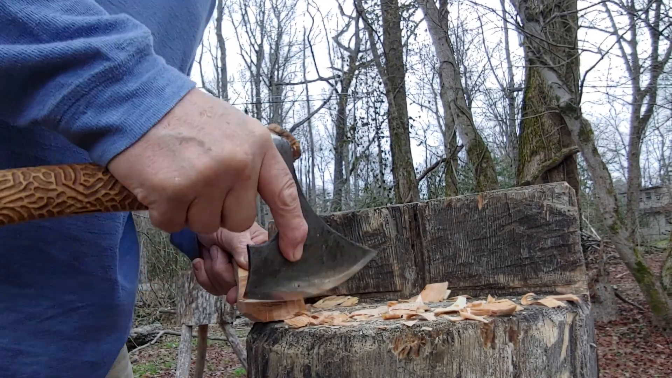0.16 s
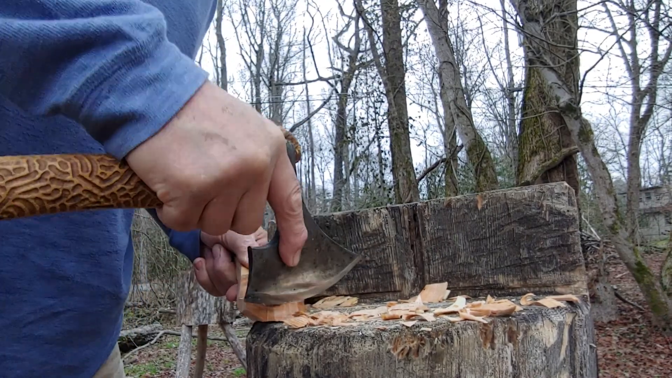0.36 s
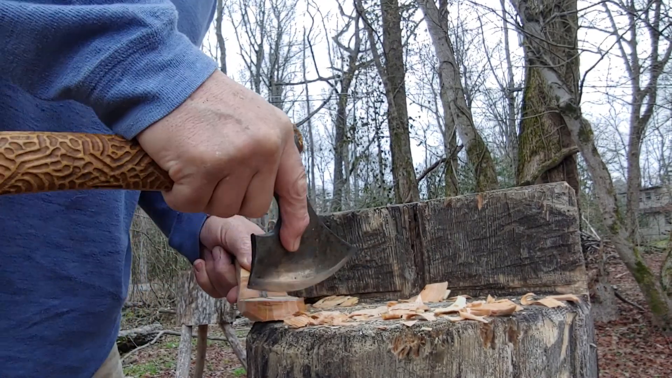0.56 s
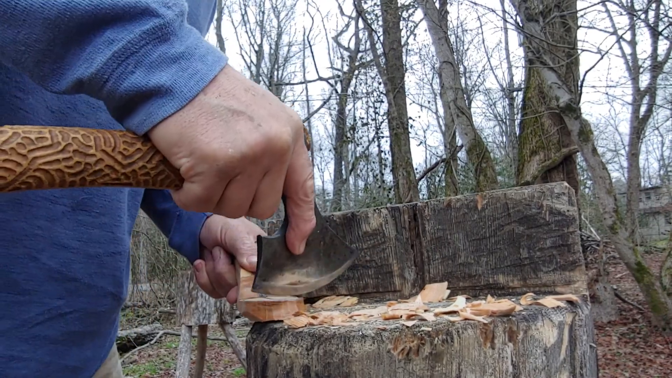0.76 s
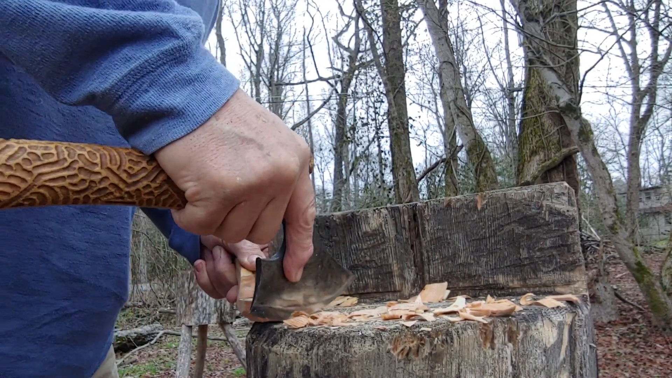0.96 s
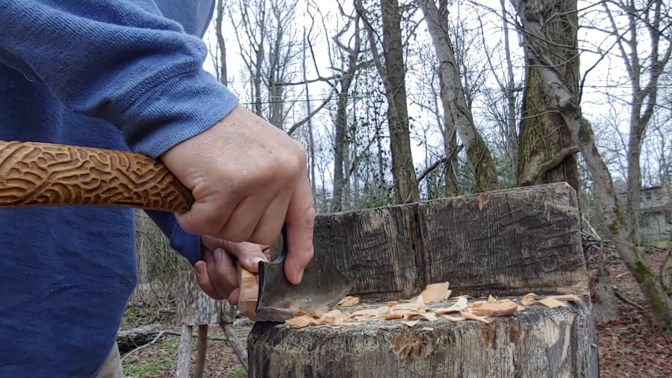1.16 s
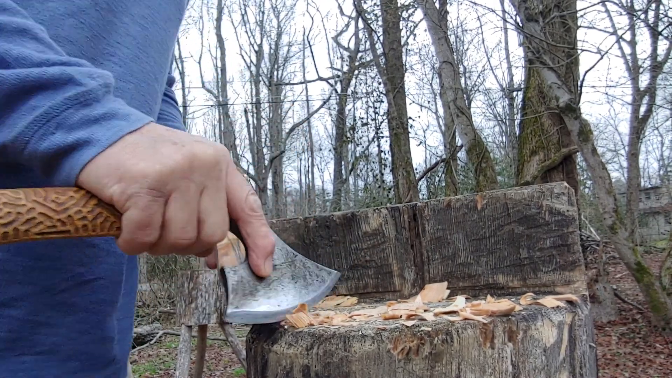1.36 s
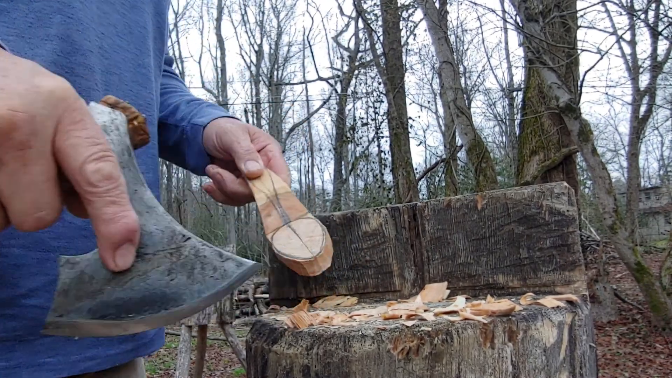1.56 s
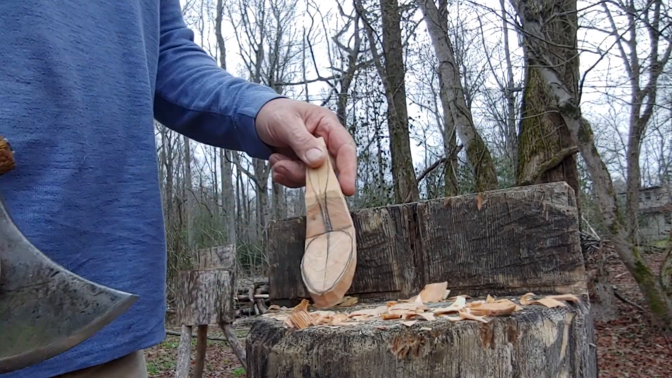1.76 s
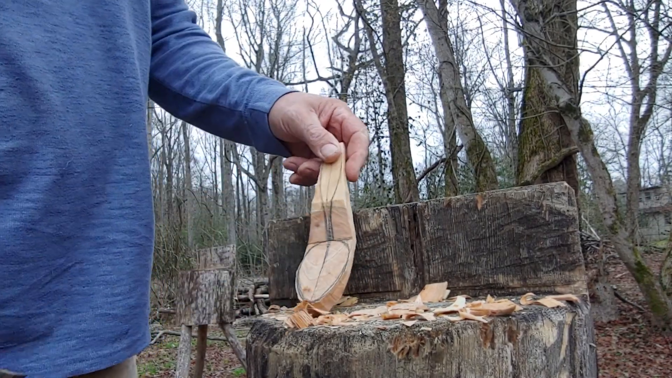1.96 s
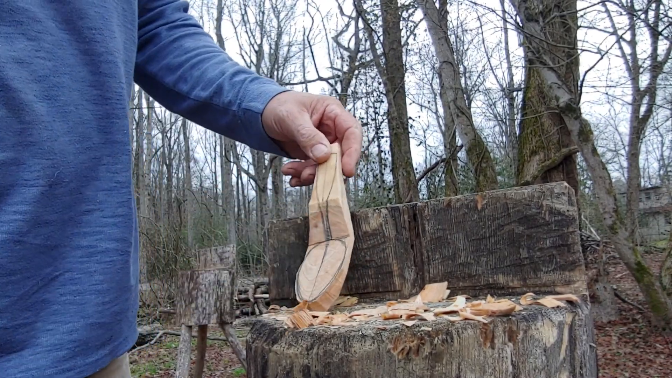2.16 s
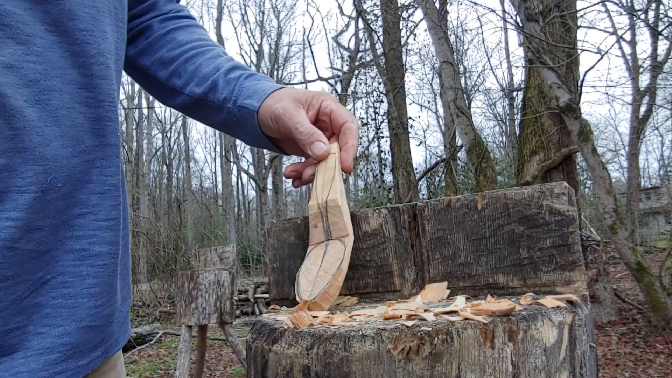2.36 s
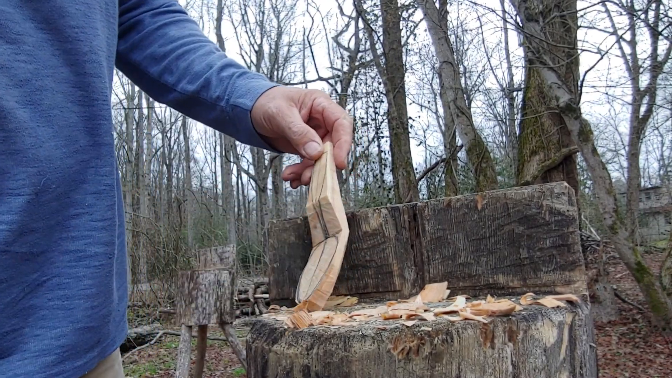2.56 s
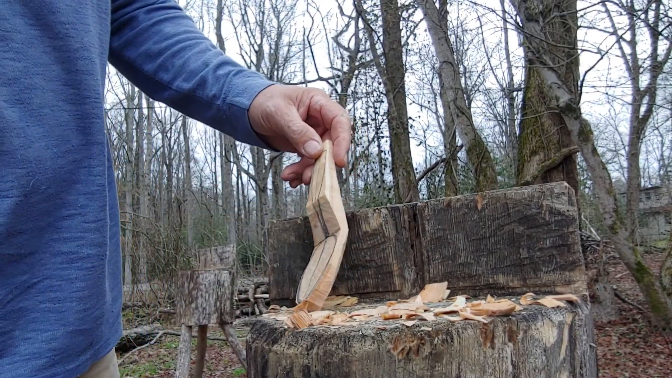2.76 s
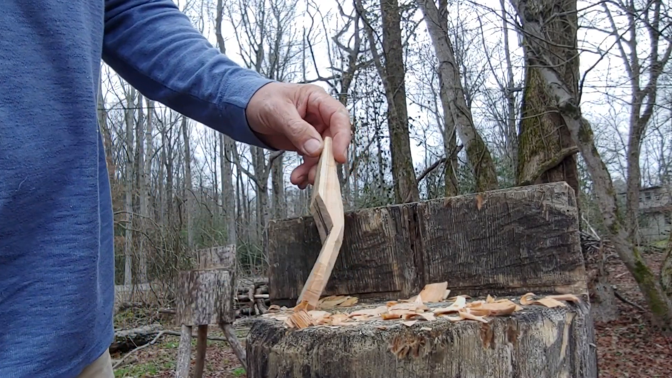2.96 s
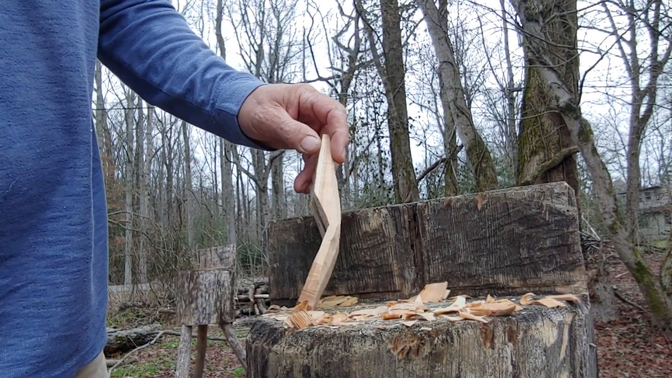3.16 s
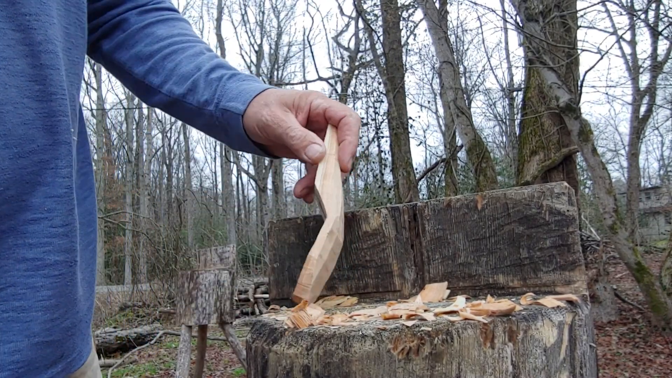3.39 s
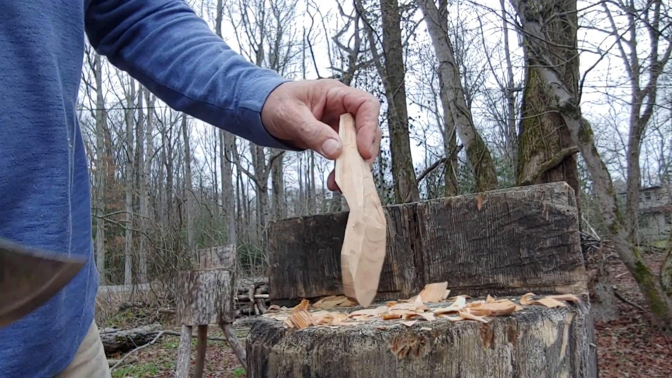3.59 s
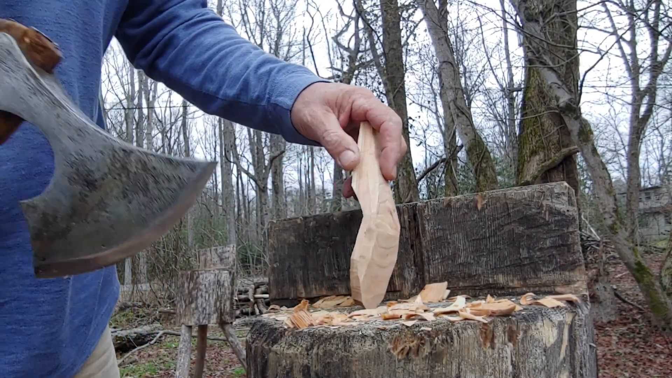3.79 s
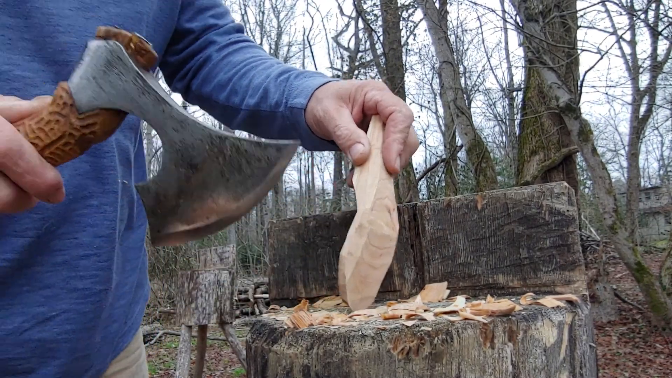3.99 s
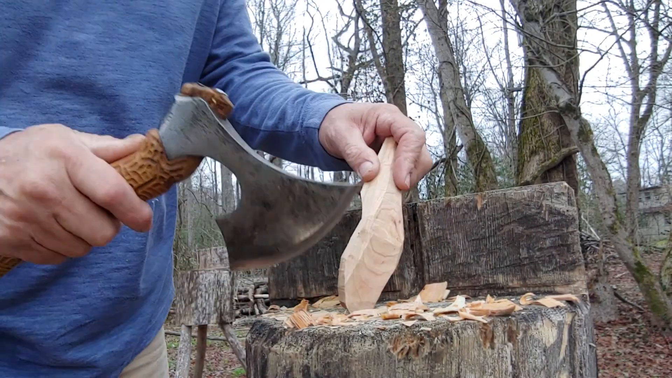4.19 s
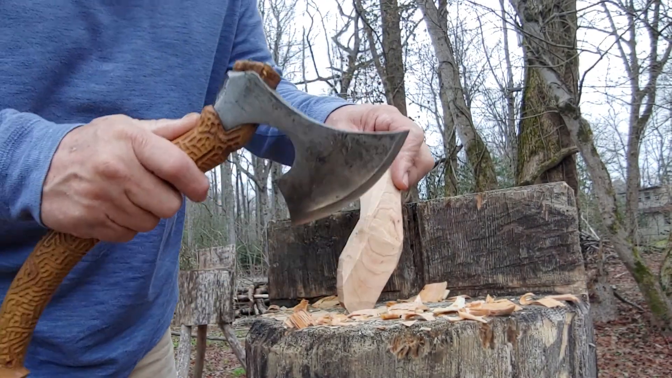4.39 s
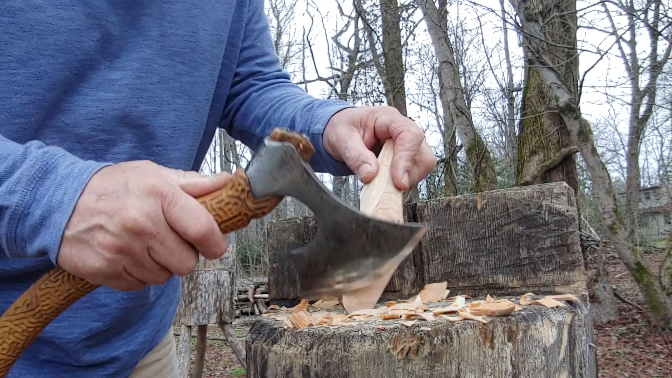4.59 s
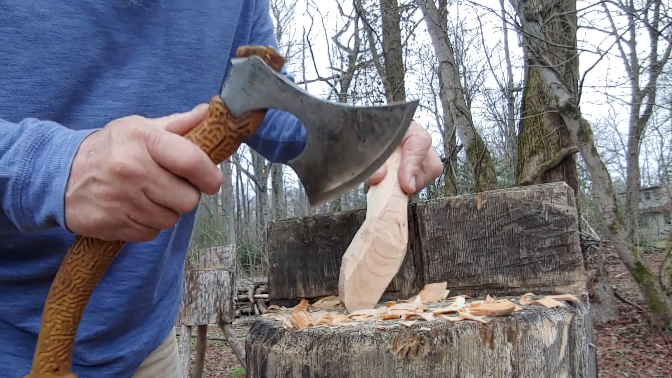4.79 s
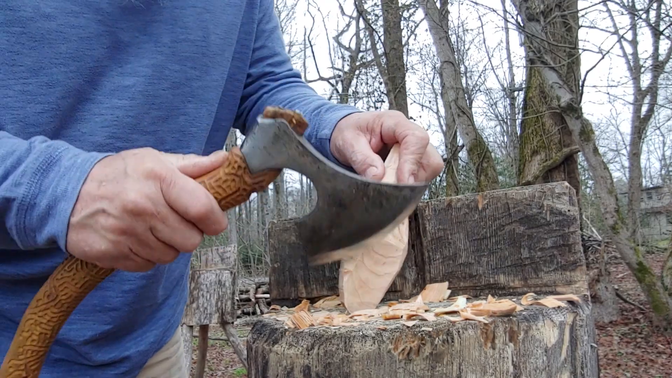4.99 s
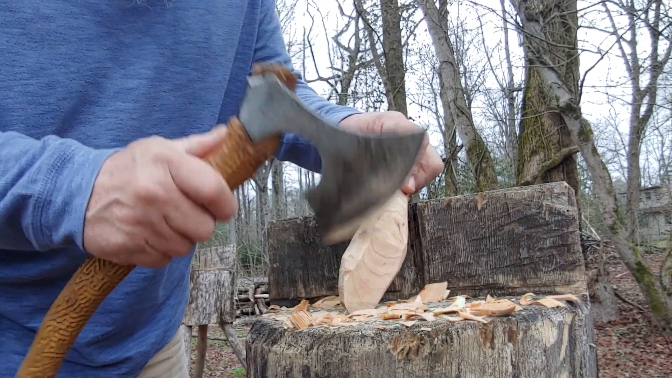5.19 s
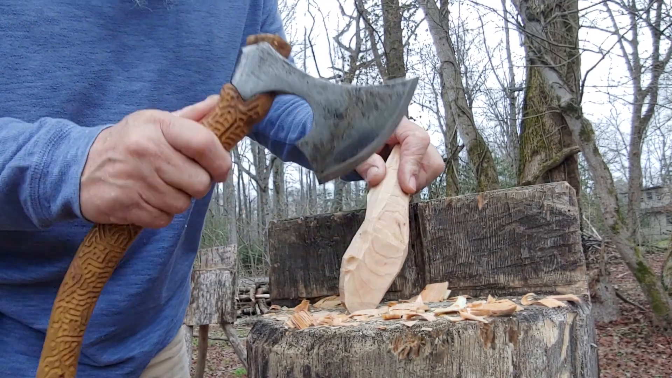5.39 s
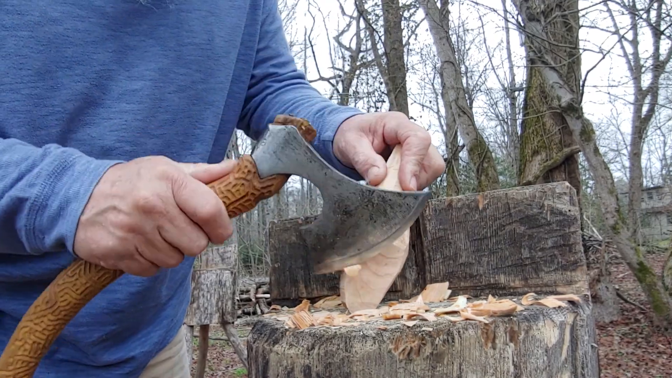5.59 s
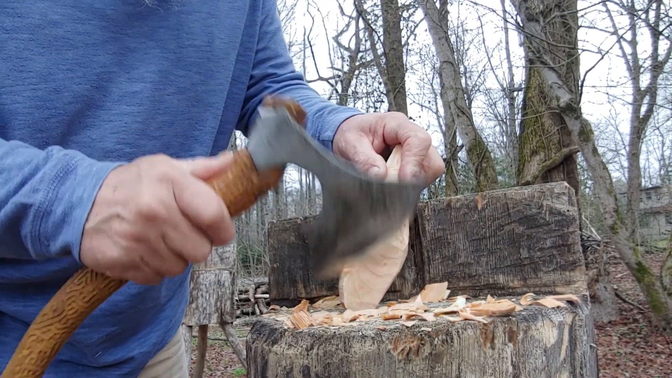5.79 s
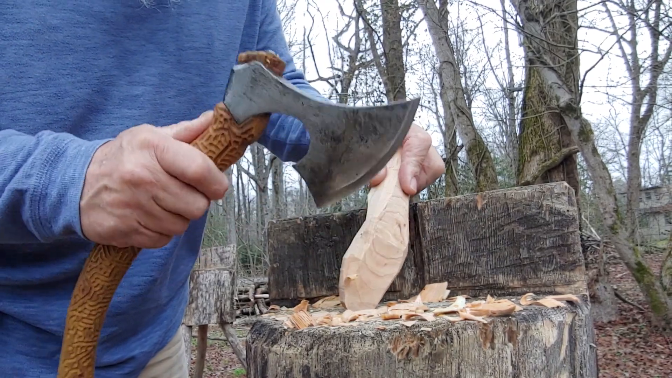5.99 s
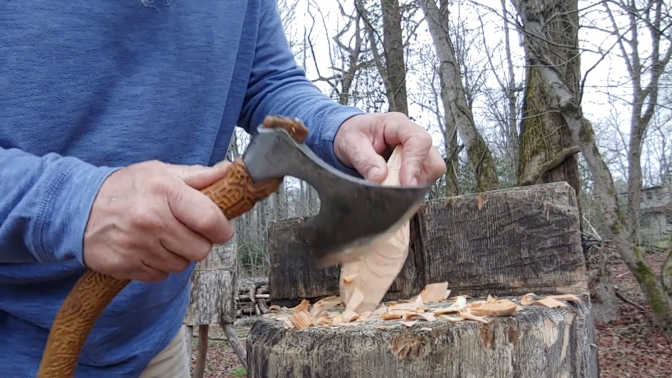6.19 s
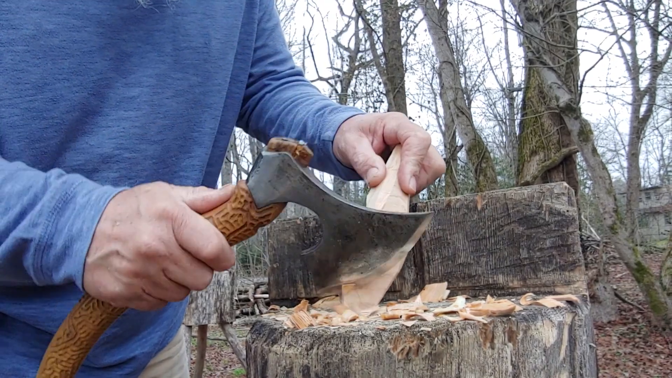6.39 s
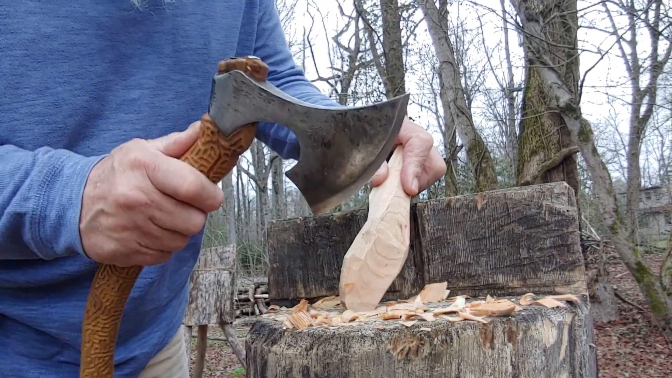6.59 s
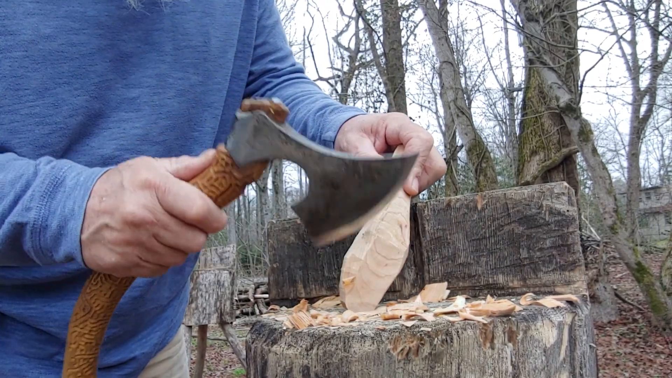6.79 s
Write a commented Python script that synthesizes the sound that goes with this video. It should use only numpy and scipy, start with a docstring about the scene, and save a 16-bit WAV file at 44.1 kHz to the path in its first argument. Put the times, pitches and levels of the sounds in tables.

```python
"""A hand axe shapes a wooden spoon blank on a stump in a wood, close to a pair of microphones.
Three careful cuts, a pause with sleeve rustle and a change of grip, then a run of quick chops.
Each chop is a knock, a burst of tearing fibres, a faint steel ring and a thud that rocks the stump.
A chip lands just after. Light taps and scrapes are scattered tiny clicks with a woody colour.
Trees echo, birds call far off as gliding tones, and a light breeze rumbles as filtered noise."""
import sys
import numpy as np
from scipy import signal
from scipy.fft import rfft, irfft, next_fast_len
from scipy.io import wavfile
from scipy.ndimage import uniform_filter1d

SR = 44100
rng = np.random.default_rng(int(sys.argv[2]) if len(sys.argv) > 2 else 0)


def dump_mix(stems):
    """Bounce the given channels to the path in sys.argv[1] as a 16-bit WAV at rate SR."""
    frames = np.atleast_2d(stems).T  # one column per channel
    limited = np.clip(frames, -1, 1)  # hard clip at full scale
    pcm = np.round(limited * 32767).astype(np.int16)
    wavfile.write(sys.argv[1], SR, pcm)


N = 302085
TIME = np.arange(N) / SR
HZ = np.fft.rfftfreq(4096, 1 / SR)  # frequencies on which short filters are drawn


def amp(db):
    """Turns decibels into gain."""
    return 10 ** (np.asarray(db) / 20)


def unit(x):
    """Scales a signal to rms 1."""
    return x / np.sqrt(np.mean(x ** 2) + 1e-20)


def sized(x, db, seconds):
    """Scales a burst to the energy of a level held for so many seconds."""
    return x * amp(db) * np.sqrt(seconds * SR / (np.sum(x ** 2) + 1e-20))


def add(mix, s, sound):
    """Adds a stereo sound to the mix at time s, cutting off whatever falls outside."""
    start = round(s * SR)
    sound = sound[:, max(-start, 0):]
    part = mix[:, max(start, 0):][:, :sound.shape[1]]
    part += sound[:, :part.shape[1]]


def read(points, hz):
    """Reads a table of values between its points, along a log-frequency axis."""
    f, value = np.transpose(points)
    return np.interp(np.log(hz + 1), np.log(f + 1), value)


def response(db):
    """Makes a short sound that starts at once (minimum phase) from a dB spectrum on the HZ grid."""
    both_halves = np.r_[db, db[-2:0:-1]]
    log_gain = np.log(amp(both_halves))
    return np.fft.ifft(np.exp(signal.hilbert(log_gain).conj())).real


def coloured(x, points):
    """Gives a scene-long signal a spectrum, at rms 1."""
    gain = amp(read(points, np.fft.rfftfreq(N, 1 / SR)))
    return unit(irfft(rfft(x) * gain, N))


def bump(hz, width, db):
    """A resonance, drawn as a rise in the dB spectrum."""
    return db / (1 + (2 * (HZ - hz) / width) ** 2)


def swell(s, rise_s, fall_s):
    """A smooth rise to 1 at time s and a smooth fall."""
    return np.exp(-((TIME - s) / np.where(TIME < s, rise_s, fall_s)) ** 2)


# how the two microphone ports differ in level: (frequency [Hz], left minus right [dB])
PORT_LEVELS = [(200, -.5), (460, -2.5), (850, 4.5), (1150, 4.5), (1600, -4), (2150, 8), (2600, -0.5),
               (3000, -4), (3700, 6), (4900, -9), (6300, 13.5), (8000, -12.5), (11300, 10)]
# how far the nearer port is ahead: (frequency [Hz], phase lead [radians])
PORT_LEAD = [(200, 0.5), (500, 1.16), (750, 0.3), (950, 1.88), (1400, 0.7), (1900, 1.98), (2500, 1.65),
             (3100, 2.5), (4500, 2.5), (5300, -0.9), (6300, 6), (11000, 6)]


def placed(x, side):
    """Places a sound: side 1 is left, -1 right; the nearer port leads and the two differ in tone."""
    size = next_fast_len(len(x) + len(HZ))
    hz = np.fft.rfftfreq(size, 1 / SR)
    level = amp(side * read(PORT_LEVELS, hz) / 2)
    half = level * np.exp(.5j * side * read(PORT_LEAD, hz))
    late = np.r_[np.zeros(8), x]  # room for the leading port
    return irfft(rfft(late, size) * np.array([half, 1 / half]), size)[:, :len(x)]


# broad colour of the struck wood: (frequency [Hz], level [dB])
WOOD_COLOUR = [(40, -25), (200, -19), (350, -8), (480, -11.5), (750, -1.5), (1500, -4), (2100, -4.5),
               (3100, -5.5), (3700, -10.5), (5000, -13.5), (7000, -10), (11000, -30.5), (16000, -42)]
# resonances of the blank: (frequency [Hz], width [Hz], rise over the broad colour [dB])
BLANK_MODES = [(343, 450, 5), (777, 51, 3.5), (1450, 130, 4), (2688, 150, 4), (3200, 230, 5),
               (4240, 290, 9), (4620, 28, 0.5), (6030, 110, 1)]


def wood(treble_db):
    """Spectrum of the blank in dB; a sharper excitation lifts the treble."""
    modes = sum(bump(*mode) for mode in BLANK_MODES)
    return read(WOOD_COLOUR, HZ) + modes + treble_db * HZ ** 2 / (HZ ** 2 + 2800 ** 2)


def fibres(count, per_s, spread_db):
    """Snaps of uneven size at random moments, over count samples, at rms 1."""
    size = amp(spread_db * np.minimum(rng.exponential(1, count), 3))
    snaps_now = rng.random(count) < per_s / SR
    return unit(size * rng.choice([-1, 1], count) * snaps_now)


# every axe blow: (time [s], knock level [dB], tearing level [dB], time until the chip breaks [s],
# tearing t60 [s], treble lift [dB], chip pitch [Hz], stump thud level [dB])
CHOPS = [(0.364, -30.5, -34, .0018, .024, -10, 660, -36),
         (0.8306, -31.5, -45, 0.0022, 0.049, -65, 825, -54),
         (0.9881, -31.5, -31, 0.0014, 0.013, 16.5, 1100, -36),
         (4.5889, -35, -43.5, 0.0033, 0.035, 1, 1090, -49.5),
         (4.9157, -22.5, -22.5, 0.0049, 0.022, -6.5, 1270, -31.5),
         (5.217, -16, -22, .0045, 0.018, -3.5, 1385, -28),
         (5.519, -19, -19.5, .0062, 0.035, -8.5, 1052, -33),
         (5.8036, -20.5, -20.5, .0065, 0.041, -3.5, 1130, -52),
         (6.0978, -18, -19, 0.0042, 0.034, -3, 1525, -34),
         (6.387, -19.5, -18, .0049, .025, -6.5, 2086, -39),
         (6.6708, -21, -18.5, 0.0045, 0.023, -8.5, 1644, -32.5)]
# where the blank stands (1 left, -1 right): laid down at first, upright after the change of grip
LAID_SIDE, UPRIGHT_SIDE = -0.37, 0.85
REGRIP_S = 4.4
# the landing chip: typical delay [s], level against the tearing [dB], treble lift [dB], pitch [Hz]
FALL_S, FALL_DB, FALL_TREBLE_DB, FALL_HZ = 0.055, -40.5, 11, 600


def chops():
    """Every blow of the axe, and the chip that lands after a slightly uneven flight."""
    out = np.zeros((2, N))
    flights = rng.uniform(.88, 1.12, len(CHOPS))
    for (s, knock_db, tear_db, *cut), flight in zip(CHOPS, flights):
        side = LAID_SIDE if s < REGRIP_S else UPRIGHT_SIDE
        add(out, s, chop(knock_db, tear_db, *cut, side))
        add(out, s + FALL_S * flight, tap(tear_db + FALL_DB, FALL_TREBLE_DB, FALL_HZ))
    return out


def chop(knock_db, tear_db, break_s, t60, treble_db, chip_hz, thud_db, side):
    """The edge knocks on the blank, fibres tear until the chip breaks, and the stump takes the blow."""
    t = np.arange(SR // 4) / SR
    break_s = max(break_s, .0005)
    sound = tearing(t, tear_db, break_s, t60, treble_db, chip_hz) + axe_ring(t, tear_db)
    knock = edge_knock(knock_db, chip_hz)
    sound[:len(knock)] -= knock
    thud = stump_thud(thud_db)
    sound[round(break_s * SR):][:len(thud)] += thud
    return placed(sound + stump_rocking(t, thud_db), side)


def tearing(t, db, break_s, t60, treble_db, chip_hz):
    """Fibres snap ever harder until the chip breaks, then die away; wood and chip colour them."""
    force = np.where(t < break_s, t / break_s, amp(-60 * (t - break_s) / t60))
    snaps = force * fibres(len(t), per_s=11000, spread_db=6.5)
    snaps[round(break_s * SR)] -= 8  # the chip lets go
    colour = response(wood(treble_db) + bump(chip_hz, 420, 4.8) + split_colour())
    return sized(signal.fftconvolve(snaps, colour)[:len(t)], db, 0.015)


def split_colour(count=5, width_hz=110, rise_db=5):
    """Each cut leaves a splinter of its own shape, with a few resonances at chance pitches."""
    pitches = np.exp(rng.uniform(np.log(1000), np.log(3400), count))
    return sum(bump(hz, width_hz, rise_db) for hz in pitches)


# faint ring of the axe head: (frequency [Hz], level among the partials [dB], t60 [s])
STEEL_MODES = [(1310, -15, .12), (2360, -8.5, 0.16), (3220, -4, 0.52), (3350, 2, 0.11), (5800, 1.5, 0.075),
               (6700, -1, 0.1)]
STEEL_DB = -35  # against the tearing level


def axe_ring(t, tear_db):
    """The steel head rings as dying sine tones, faded at both ends."""
    ring = 0
    for hz, db, decay in STEEL_MODES:
        phase = rng.uniform(0, 2 * np.pi)
        ring = ring + amp(db - 60 * t / decay) * np.sin(2 * np.pi * hz * t + phase)
    return sized(ring * signal.windows.tukey(len(t), .03), tear_db + STEEL_DB, 0.0058)


# broad colour of the edge striking the blank: (frequency [Hz], level [dB])
KNOCK_COLOUR = [(40, -42.5), (200, -15), (480, -5), (800, 5.5), (1300, -5.5), (2500, -27), (5000, -41),
                (16000, -60)]
# chip pitch at which the knock has this plain colour; exponent by which it follows a higher chip
KNOCK_HZ, KNOCK_FOLLOWS = 1150, 0.49


def edge_knock(db, chip_hz):
    """One short blow through the resonances of the blank; it sounds higher with a higher chip."""
    colour = read(KNOCK_COLOUR, HZ * (KNOCK_HZ / chip_hz) ** KNOCK_FOLLOWS)
    modes = sum(bump(*mode) for mode in BLANK_MODES)
    return sized(response(colour + modes), db, .0022)


# broad colour of the stump's thud: (frequency [Hz], level [dB])
STUMP_COLOUR = [(20, -16.5), (70, -6.5), (160, 3), (250, -5), (380, -5), (600, -30), (2000, -59.5),
                (16000, -91)]


def stump_thud(db):
    """The heavy stump answers with a dull, short response."""
    return sized(response(read(STUMP_COLOUR, HZ) + bump(390, 76, 5.8)), db, 0.012)


# the stump rocks: pitch [Hz], time to the widest swing [s], level against the thud [dB]
ROCK_HZ, ROCK_S, ROCK_DB = 45.4, 0.032, -9.5


def stump_rocking(t, thud_db):
    """The stump rocks as a deep tone that swells and dies."""
    sway = (t / ROCK_S * np.exp(1 - t / ROCK_S)) ** 2
    return amp(thud_db + ROCK_DB) * sway * np.sin(2 * np.pi * ROCK_HZ * t)


# light taps and ticks: the blank set down, the hand stopping on the haft, a chip falling:
# (time [s], level [dB], treble lift [dB], pitch [Hz])
TAPS = [(1.184, -47.5, -13, 447), (1.212, -62, 38, 1410), (1.555, -53, 9, 1510), (1.712, -52, 7, 477),
        (1.797, -49, -21.5, 338), (3.269, -55, 13.5, 600), (3.42, -58, 27, 500), (3.625, -44, -11, 450),
        (3.953, -47, -4, 1030), (4.017, -35.5, -79, 510), (4.048, -43, -9, 387), (4.273, -42, 6, 940),
        (4.736, -52, -9.5, 1460), (5.286, -46, 23, 1280)]


def taps():
    """Light taps and ticks: the blank set down, the hand stopping on the haft, a chip falling."""
    out = np.zeros((2, N))
    for s, *contact in TAPS:
        add(out, s, tap(*contact))
    return out


FIRM_DB = -53.5  # the louder a contact is above this, the clearer its first knock


def tap(db, treble_db, hz):
    """A light contact: a brief scatter of clicks in a woody colour, led by a knock when it is firm."""
    t = np.arange(SR // 25) / SR
    shape = np.minimum(t / 0.0027, 1) * amp(-60 * t / 0.038)
    clicks = fibres(len(t), per_s=5200, spread_db=11.5) * shape
    clicks[0] += amp(db - FIRM_DB)
    sound = signal.fftconvolve(clicks, response(wood(treble_db) + bump(hz, 570, 20)))
    return placed(sized(sound, db, 0.0019), -0.12)


# scrapes and faint hisses, some rising just before a chop, and the hand moving up the haft:
# (start [s], end [s], level grown to [dB], growth [dB], treble lift [dB], resonance [Hz],
# side [1 left, -1 right])
SCRAPES = [(0.935, 0.989, -30.5, 21, 3.5, 2540, -0.29), (3.242, 4, -67.5, 4.5, -32, 776, -1.9),
           (4.123, 4.276, -46.5, 5.5, -7, 1033, -0.84), (5.784, 5.803, -54, 13, 10.5, 2016, 0.71),
           (6.073, 6.109, -46.5, 10, 12, 3490, 0.66), (6.361, 6.398, -49, 11.5, 7.5, 2985, 0.68)]


def scrapes():
    """Scrapes and faint hisses: dense tiny clicks of uneven strength that grow, then stop."""
    out = np.zeros((2, N))
    for start, end, db, growth_db, treble_db, hz, side in SCRAPES:
        u = np.linspace(0, 1, round((end - start) * SR))
        colour = response(wood(treble_db) + bump(hz, 530, 7.9))
        uneven_db = 1.7 * unit(uniform_filter1d(rng.standard_normal(len(u)), size=500))
        clicks = fibres(len(u), per_s=5700, spread_db=3.0) * amp(uneven_db)
        rub = unit(signal.fftconvolve(clicks, colour)[:len(u)])
        shape = amp(db - growth_db * (1 - u)) * signal.windows.tukey(len(u), .15)
        add(out, start, placed(rub * shape, side))
    return out


# arm movements: (time at the fastest [s], time to speed up [s], time to slow down [s],
# fibre hiss level [dB], fold rustle level [dB])
MOVES = [(.42, 0.34, 0.22, -73.5, -64.5), (1.07, 0.18, 0.23, -72, -62), (1.7, 0.38, 0.29, -68.5, -65),
         (2.85, .1, 0.16, -77, -66), (3.701, 0.41, 0.38, -66.5, -58), (4.202, 0.15, 0.12, -67, -58.5),
         (5.1, 0.4, 0.17, -76.5, -66)]
# colour of the hissing fibres: (frequency [Hz], level [dB])
CLOTH_COLOUR = [(100, -29), (700, -5.5), (1400, -0.5), (2500, 3.5), (4000, 4.5), (5200, -7.5), (6500, -2.5),
                (8000, -8.5), (16000, -33.5)]
# colour of the rustling folds: (frequency [Hz], level [dB])
FOLD_COLOUR = [(60, -13.5), (200, 3), (350, 10), (600, -2), (1200, -1.5), (2000, -19.5), (16000, -47.5)]
# grit and shavings under the moving hand: ticks a second, level against the fibre hiss [dB]
GRIT_PER_S, GRIT_DB = 100, -12


def sleeve():
    """As the arms move, fibres hiss, folds of cloth rustle and grit ticks under the hand."""
    hiss_level = sum(amp(db) * swell(*timing) for *timing, db, _ in MOVES)
    fold_level = sum(amp(db) * swell(*timing) for *timing, _, db in MOVES)
    catch_db = 1.7 * unit(uniform_filter1d(rng.standard_normal(N), size=900))
    hiss = patchy(coloured(fibres(N, per_s=5400, spread_db=3.5), CLOTH_COLOUR), depth_db=3.0)
    ticks = fibres(N, per_s=GRIT_PER_S, spread_db=-1)
    grit = unit(signal.oaconvolve(ticks, response(wood(treble_db=7.5)))[:N])
    folds = patchy(coloured(rng.standard_normal(N), FOLD_COLOUR), depth_db=4)
    rustle = (hiss + amp(GRIT_DB) * grit) * hiss_level + folds * fold_level
    return placed(rustle * amp(catch_db), -0.8)


def patchy(x, depth_db):
    """Lets narrow bands swell and fade at random, at rms 1."""
    z = signal.stft(x, SR, nperseg=1024)[2]
    across_pitch = uniform_filter1d(rng.standard_normal(z.shape), size=5, axis=0)
    patches = unit(uniform_filter1d(across_pitch, size=7, axis=1))
    return unit(signal.istft(z * amp(depth_db * patches), SR, nperseg=1024)[1][:N])


# Bird levels here are taken close to the bird; scene() sets the distance.
# single calls: (time [s], length [s], first pitch [Hz], middle pitch [Hz], last pitch [Hz],
# level [dB], base pitch unsteadiness [share])
BIRD_NOTES = [(0.856, 0.062, 8200, 7860, 7500, -57.5, 0.02), (2.895, 0.03, 6350, 6140, 6200, -72, .005),
              (3.854, 0.098, 4240, 4560, 4510, -69, 0.02), (4.739, 0.23, 1650, 1780, 1638, -60, .07),
              (4.751, .06, 3320, 3820, 3350, -60, 0.05), (4.978, 0.19, 1670, 1660, 1526, -53.5, .05),
              (5.369, 0.01, 3940, 3780, 3700, -63.5, .003), (5.375, 0.019, 5450, 5000, 5020, -66, .003)]
# nearly level whistles that swell to a late peak: (time [s], pitch [Hz], level [dB])
PIPES = [(2.15, 2000, -63.5), (2.449, 2544, -73.5), (2.66, 2520, -70), (2.78, 2008, -62.5),
         (2.879, 2515, -72.5), (3.4, 2012, -59.5)]
# length [s], share of pitch by which it starts above and ends below, loudest point [share of length]
PIPE_S, PIPE_SAG, PIPE_PEAK = .15, 0.0093, .68
PIPE_WAVER = 0.0086  # base unsteadiness of their pitch, as a share
# rising calls: (time [s], level [dB])
RISES = [(-.03, -67), (3.591, -64.5), (5.82, -77.5)]
# the two overlapping slurs of a rising call: (delay [s], length [s], first pitch [Hz],
# middle pitch [Hz], last pitch [Hz], level against the call [dB])
RISE_SLURS = [(0, .2, 3300, 3910, 4490, 2), (.01, .26, 3250, 3707, 4276, 0)]
# the up-slur and down-slur of a song phrase: (delay [s], length [s], first pitch [Hz],
# middle pitch [Hz], last pitch [Hz], level against the phrase [dB])
PHRASE_SLURS = [(0, .1, 1720, 2050, 2750, 0), (.108, .026, 4100, 3620, 3330, -2)]
# a song that repeats one phrase, swelling and then fading away: first start, spacing, loudest time
SONG_START_S, PHRASE_S, SONG_TOP_S = -.042, .269, 0.51
SONG_DB, SONG_FADE_DB_PER_S2 = -63.5, 6


def birds(count=7):
    """Single calls, level whistles, rising calls and a song of count phrases."""
    out = np.zeros((2, N))
    for s, *note in BIRD_NOTES:
        add(out, s, whistle(*note))
    for s, hz, db in PIPES:
        first_hz, last_hz = hz * (1 + PIPE_SAG), hz * (1 - PIPE_SAG)
        add(out, s, whistle(PIPE_S, first_hz, hz, last_hz, db, PIPE_WAVER, PIPE_PEAK))
    for s, db in RISES:
        add(out, s, slurred(RISE_SLURS, db))
    for s in SONG_START_S + PHRASE_S * np.arange(count):
        phrase_db = SONG_DB - SONG_FADE_DB_PER_S2 * (s - SONG_TOP_S) ** 2
        add(out, s, slurred(PHRASE_SLURS, phrase_db))
    return out


def slurred(slurs, db):
    """A call made of several slurs, in a second of its own."""
    out = np.zeros((2, SR))
    for delay, *glide, slur_db in slurs:
        add(out, delay, whistle(*glide, db + slur_db))
    return out


def whistle(length, first_hz, middle_hz, last_hz, db, waver=0.003, peak=0.55):
    """One gliding note, loudest at the share peak of its length; a wider slur has a burrier voice."""
    u = np.linspace(0, 1, round(length * SR))
    hz = np.polyval(np.polyfit([0, .5, 1], [first_hz, middle_hz, last_hz], 2), u)
    unsteady = waver + .025 * np.ptp(hz) / middle_hz
    hz = hz * (1 + unsteady * unit(uniform_filter1d(rng.standard_normal(len(u)), size=120)))
    arch = np.sin(np.pi * np.interp(u, [0, min(peak, .95), 1], [0, .5, 1]))
    tone = np.sin(2 * np.pi * np.cumsum(hz) / SR)
    return placed(amp(db) * unit(tone * arch), -0.6)


def echoes(x, t60s, delay):
    """Scattered reflections that set in after a delay and die band by band."""
    t = np.arange(SR) / SR
    arrives = rng.random((2, SR)) < 3000 / SR
    scatter = rng.choice([-1., 1.], (2, SR)) * arrives * (t > delay)
    hz, at, z = signal.stft(scatter, SR, nperseg=256)
    decay = amp(-60 * at / read(t60s, hz)[:, None])
    tail = signal.istft(z * decay, SR, nperseg=256)[1]
    tail = tail / np.linalg.norm(tail[0])
    return signal.fftconvolve(x.mean(0)[None], tail, axes=1)[:, :N]


# low rumble of moving air: (frequency [Hz], level [dB])
RUMBLE_COLOUR = [(15, -12.5), (40, 2), (90, 2), (150, -8.5), (300, -21), (1000, -56), (16000, -97)]
# gusts on the microphones: (time at the strongest [s], rise time [s], fall time [s], level [dB])
GUSTS = [(0.998, 0.051, 0.2, -45.5), (6.8, 0.071, 0.12, -48.5)]
BREEZE_DB, SWELL_DB = -55, 1.4  # middle level of the rumble and rms of its slow swell


def breeze():
    """A low rumble that swells by chance, with a gust now and then."""
    rates_hz = np.geomspace(1.5, 9, 16)
    drift = unit(sum(np.sin(2 * np.pi * (hz * TIME + rng.random())) for hz in rates_hz))
    gusts = sum(amp(db) * swell(*timing) for *timing, db in GUSTS)
    level = amp(BREEZE_DB + SWELL_DB * drift) + gusts
    return outdoors(RUMBLE_COLOUR, apart=0.36) * level


def outdoors(points, apart):
    """Steady noise, partly shared by the two ports; a larger apart makes them differ more."""
    shared = rng.standard_normal(N)
    return coloured(shared + apart * rng.standard_normal((2, N)), points)


# how long echoes from the tree trunks last: (frequency [Hz], t60 [s])
FOREST_T60 = [(100, 0.55), (1000, 0.46), (4000, 0.57), (10000, 0.54)]
# steady background air: (frequency [Hz], level [dB])
AIR_COLOUR = [(120, -25.5), (200, -12.5), (500, -8), (883, -15.5), (1160, -16.5), (2380, -24.5),
              (3830, -29.5), (6500, -41), (16000, -50)]


def scene():
    """Axe work with near and far echoes, birds deep among the trees, and the low stir of the air."""
    work = chops() + taps() + scrapes()
    # near: ground, stump and body; far: tree trunks
    near = amp(-21.5) * echoes(work, [(200, 0.092), (8000, 0.15)], delay=0.01)
    far = amp(-38.0) * echoes(work, FOREST_T60, delay=0.062)
    calls = birds()
    call_echoes = echoes(calls, [(2000, 0.62), (4000, 0.31)], delay=0.013)
    song = amp(-6.0) * calls + amp(-5) * call_echoes
    air = amp(-69.0) * outdoors(AIR_COLOUR, apart=5.5)
    return work + near + far + song + sleeve() + breeze() + air


# colour of the microphones: (frequency [Hz], level [dB])
MICROPHONE_COLOUR = [(3000, 0.5), (4000, 4), (5000, 0.5), (5600, 4), (7050, 7.5), (7600, -7.5), (8600, 2),
                     (11700, 5), (13000, -22), (16000, -19.5)]
EDGE_HZ = 16600  # upper band limit


def record(dry, ceiling=.93):
    """Microphone colour, a soft ceiling on the sharpest cracks, then the band limit."""
    colour = response(read(MICROPHONE_COLOUR, HZ))
    heard = signal.oaconvolve(dry, colour[None], axes=1)[:, :N]
    heard = heard / (1 + (heard / ceiling) ** 6) ** (1 / 6)
    band_limit = signal.firwin(511, EDGE_HZ, window=("kaiser", 9), fs=SR)
    return signal.oaconvolve(heard, band_limit[None], "same")


dry = scene()
out = record(dry)
dump_mix(out)
```